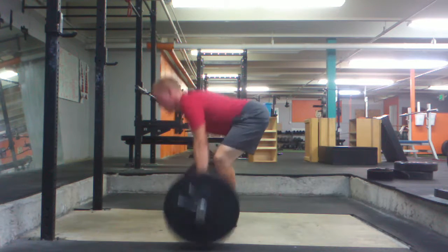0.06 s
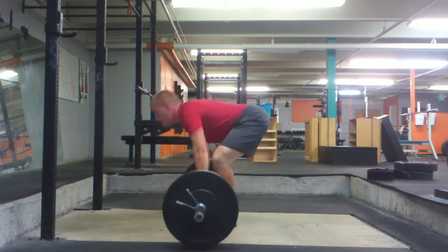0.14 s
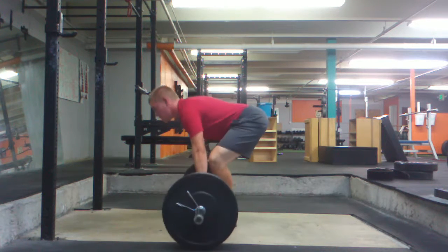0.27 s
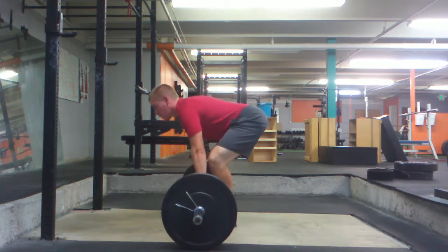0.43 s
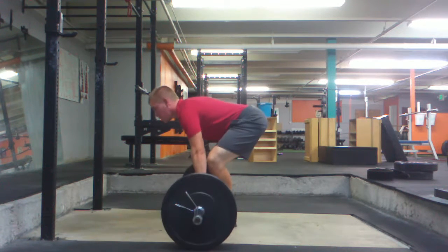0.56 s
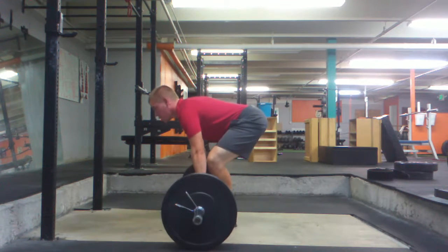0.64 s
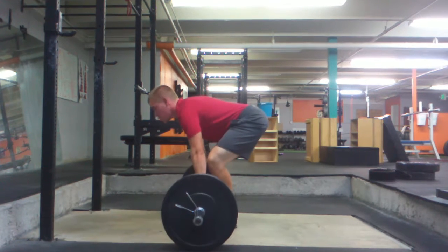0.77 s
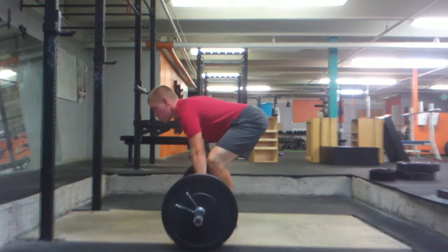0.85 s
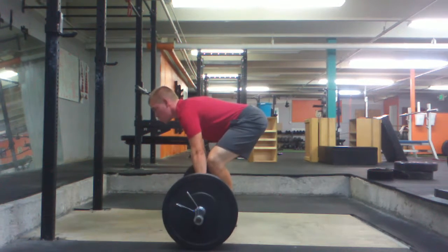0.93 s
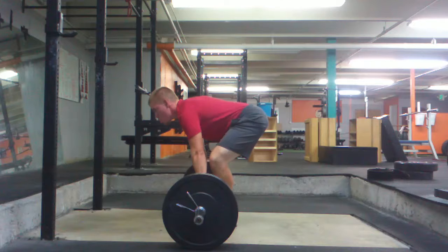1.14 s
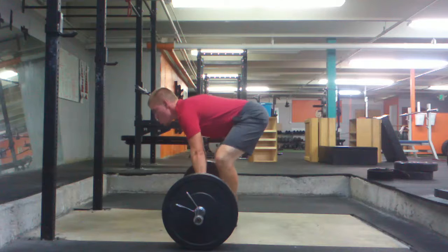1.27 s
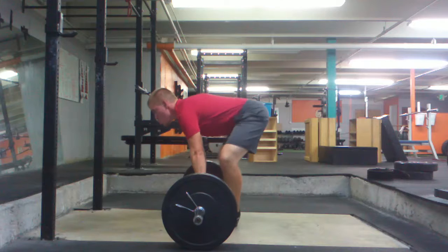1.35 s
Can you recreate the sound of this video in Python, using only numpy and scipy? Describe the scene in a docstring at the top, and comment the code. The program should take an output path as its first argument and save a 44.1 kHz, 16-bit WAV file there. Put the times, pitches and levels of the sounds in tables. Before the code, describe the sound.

A loaded barbell crashes onto a gym platform, clanking and ringing in the echoing room.

```python
"""Ventilation hums and hisses in a large, hard-walled gym. A loaded barbell drops onto a lifting platform:
the collars tick, the rubber rims thud, the steel sleeves clank and ring, and the plates land and settle.
Their crash fills the room and overloads a small, close mono microphone for a third of a second.
As the crash dies away, the bar goes on flexing with a deep note."""
import sys
import numpy as np
from scipy import signal
from scipy.fft import rfft, irfft
from scipy.io import wavfile

SR = 44100
rng = np.random.default_rng(int(sys.argv[2]) if len(sys.argv) > 2 else 0)


def dump_mix(stems):
    """Bounce the given channels to the path in sys.argv[1] as a 16-bit WAV at rate SR."""
    frames = np.atleast_2d(stems).T  # one column per channel
    limited = np.clip(frames, -1, 1)  # hard clip at full scale
    pcm = np.round(limited * 32767).astype(np.int16)
    wavfile.write(sys.argv[1], SR, pcm)


N = 61739
BIN_HZ = np.fft.rfftfreq(2 * N, 1 / SR)


def amp(db):
    """Decibels to gain."""
    return 10 ** (np.asarray(db) / 20)


def curve(points, hz):
    """Reads a table on a log-frequency axis."""
    f, value = np.transpose(points)
    return np.interp(np.log(hz + 1), np.log(f + 1), value)


def since(start_s):
    """Seconds since a moment, zero before it."""
    return np.maximum(np.arange(N) / SR - start_s, 0)


def fade(t, t60):
    """Decay of 60 dB in t60 seconds."""
    return np.exp(-np.log(1000) * t / t60)


def noise(eq):
    """Noise of rms 1, coloured by an EQ table."""
    x = irfft(rfft(rng.standard_normal(2 * N)) * amp(curve(eq, BIN_HZ)))[:N]
    return x / np.sqrt(np.mean(x ** 2) + 1e-20)


def wander(x, count=256):
    """A random drift of about unit size, with a new value at each whole x."""
    return np.interp(x, np.arange(count), rng.standard_normal(count))


def strike(modes, start_s):
    """Decaying sines, struck together."""
    t = since(start_s)
    return sum(amp(db) * fade(t, t60) * np.sin(2 * np.pi * hz * t) for hz, db, t60 in modes)


# Tone of the air hiss: freq_hz, gain_db
AIR_EQ = [(20, -28), (35, -20), (70, -8), (120, -6), (200, -3.5), (400, -4), (650, -2), (800, -4.5),
          (1100, -2.5), (1700, -7), (3000, -10), (6600, -11), (8000, -18), (9800, -25.5), (10400, -36),
          (16000, -77)]
# Partials of the fan hum: harmonic_number, rms_db
FAN_HARMONICS = [(1, -40.5), (2, -50.5), (3, -46), (4, -51.5), (6, -54), (7, -57), (8, -42), (9, -68),
                 (11, -53), (12, -46.5), (13, -57)]
def ventilation(fan_hz=78.34, air_db=-36, waver_hz=6.13, waver_rad=0.51, flutter=0.13):
    """The background bed: a gently wavering fan hum in a steady hiss of air."""
    t = since(0)
    bed = amp(air_db) * noise(AIR_EQ)
    for harmonic, db in FAN_HARMONICS:
        phase = 2 * np.pi * (harmonic * fan_hz * t + rng.random()) + waver_rad * wander(t * waver_hz)
        swell = 1 + flutter * wander(t * waver_hz)
        bed += np.sqrt(2) * amp(db) * swell * np.sin(phase)
    return bed


# Bending modes of the loaded bar and platform: pitch_hz, level_db, t60_s
FLEX_MODES = [(58.36, -13.5, 4.34), (163, -24, 3.58), (236.2, -28.5, 4.57), (272.8, -15.5, 1.6),
              (331.5, -9, 1.23), (364.1, -8.5, 1.17), (545.6, -13.5, 0.39)]
def bar_flex(landing_s):
    """The deep tail: bar and platform go on flexing after the landing."""
    return strike(FLEX_MODES, landing_s)


# Rims on wood, the landing and two small rebounds: start_s, level_db, swell_s
RIM_HITS = [(0.2304, 0.5, .014), (0.321, -6.5, 0.012), (.412, -6.5, 0.0088)]
def rim_thud(start_s, db, swell_s, knock_hz=362.7, squash_s=0.002, push_hz=69.2, push_db=-4):
    """The body: rubber rims squash against the platform, a woody knock over a low push."""
    t = since(start_s)
    knock = np.sin(2 * np.pi * knock_hz * t * t / (t + squash_s))  # pitch rises as the rubber stiffens
    push = amp(push_db) * np.sin(2 * np.pi * push_hz * t)
    envelope = t / swell_s * np.exp(1 - t / swell_s)
    return amp(db) * envelope * (knock + push)


# Short, hard ping of the collars: pitch_hz, level_db, t60_s
COLLAR_MODES = [(3563, 12.5, 0.069), (3656, 5.5, 0.084), (3278, 1.5, 0.42), (6350, 7.5, 0.087)]
def collar_clank(landing_s, graze_s=0.2286, graze_db=-36.5):
    """The attack: the collars tick faintly, then ping as the full weight lands."""
    return amp(graze_db) * strike(COLLAR_MODES, graze_s) + strike(COLLAR_MODES, landing_s)


# Plates hitting the sleeves, landing then settling: start_s, level_db
PLATE_HITS = [(0.2335, 1), (0.257, -4), (0.323, -6)]
# Ring of the steel bar, sleeves and collars: pitch_hz, relative_db
STEEL_MODES = [(2201, -15), (2860, -12), (3200, -5.5), (3290, -14), (3372, -7), (3587, -8), (3953, -4),
               (4017, -9), (4440, -9.5), (4850, -8.5), (5312, -4.5), (5746, -2), (6030, -5), (6220, -4.5),
               (6745, -5.5), (7230, -7.5), (7562, -8), (8290, -12.5), (9390, -22)]
def steel_ring(level_db=-4, build_s=0.014, count=5, split_hz=19, neighbour_db=-4.5,
               shimmer_depth=0.64, shimmer_hz=21.78):
    """The sheen: each hit's energy spreads along the bar; each mode beats with its close neighbours."""
    t, ring = since(0), np.zeros(N)
    for hz, db in STEEL_MODES:
        t60 = 0.85 * (4000 / hz) ** 0.13  # higher modes die sooner
        energy = sum((amp(hit_db) * fade(since(s), t60) * (1 - np.exp(-since(s) / build_s))) ** 2
                     for s, hit_db in PLATE_HITS)
        offsets_hz = split_hz * (np.linspace(-2, 2, count) + rng.uniform(-0.499, 0.5077, count))
        offsets_hz[count // 2] = 0
        gains = np.where(offsets_hz == 0, 1, amp(neighbour_db))
        # reflections make the mode swell, sag and waver
        shimmer = 1 + shimmer_depth * (wander(t * shimmer_hz) + 1j * wander(t * shimmer_hz))
        cycles = (hz + offsets_hz[:, None]) * t + rng.random((count, 1))
        cluster = gains @ np.sin(2 * np.pi * cycles + np.angle(shimmer))
        ring += amp(db) * np.sqrt(energy) * abs(shimmer) * cluster
    return amp(level_db) * ring


# Tone of the crash in the room: freq_hz, gain_db
CRASH_EQ = [(25, -20), (45, -15), (75, -4), (125, -5), (200, -5), (370, 3.5), (620, 2.5), (780, -7),
            (1100, -1), (1700, -3.5), (2400, 1), (3500, 2), (4600, 1), (6200, 3.5), (7500, -3),
            (9500, -7.5), (11000, -17), (16000, -36)]
# Reverb time of the gym: band_hz, t60_s
ROOM_DECAY = [(40, 4.8), (130, 1.64), (350, 1.145), (1000, 1.18), (2500, 1.019), (6000, 0.93), (8000, 0.73),
              (11000, 0.55)]
def room_crash(t, gain_db=5, build_s=0.0033):
    """One hit: the plates' dense modes spread through the room, each band dying at its own speed."""
    spectrum = rfft(noise(CRASH_EQ), 2 * N)
    centres_hz, t60s = np.transpose(ROOM_DECAY)
    tail = np.zeros(N)
    for solo, t60 in zip(np.eye(len(t60s)), t60s):
        band_gain = curve(list(zip(centres_hz, solo)), BIN_HZ)
        tail += irfft(spectrum * band_gain)[:N] * fade(t, t60)
    return amp(gain_db) * (1 - np.exp(-t / build_s)) * tail


def plate_crash(ripple_db=2.15, ripple_hz=70):
    """The main impact: the crash of all hits, coloured by the plates' crowded resonances."""
    crashes = sum(amp(db) * room_crash(since(s)) for s, db in PLATE_HITS)
    ripple = wander(BIN_HZ / ripple_hz, 2048) * np.minimum(BIN_HZ / 2000, 1)  # shallower below 2 kHz
    log_gain = np.log(amp(ripple_db * ripple))
    resonances = np.exp(np.conj(signal.hilbert(log_gain)))  # minimum phase keeps the attack sharp
    return irfft(rfft(crashes, 2 * N) * resonances)[:N]


def scene():
    """The drop over the room tone, the same in both channels."""
    landing_s = PLATE_HITS[0][0]
    rims = sum(rim_thud(*hit) for hit in RIM_HITS)
    barbell = rims + collar_clank(landing_s) + steel_ring() + plate_crash() + bar_flex(landing_s)
    return np.tile(barbell + ventilation(), (2, 1))


# Tone of the recorder: freq_hz, gain_db
RECORDER_EQ = [(20, -0.5), (7000, -3), (9700, -1), (10300, -9.5), (11000, -14.5), (15500, -13)]
def record(dry, ceiling=0.71, knee=8, cutoff_hz=15800):
    """The overloaded input flattens the peaks; the recorder dulls the top octave and cuts off."""
    oversampled = signal.resample_poly(dry, 2, 1, axis=1)
    clipped = oversampled / (0.5 + abs(oversampled / ceiling) ** knee) ** (1 / knee)
    clipped = signal.resample_poly(clipped, 1, 2, axis=1)
    dulled = irfft(rfft(clipped, 2 * N) * amp(curve(RECORDER_EQ, BIN_HZ)))[:, :N]
    lowpass = signal.firwin(511, cutoff_hz, window=("kaiser", 9), fs=SR)
    return signal.oaconvolve(dulled, lowpass[None], "same")


dry = scene()
out = record(dry)
dump_mix(out)
```